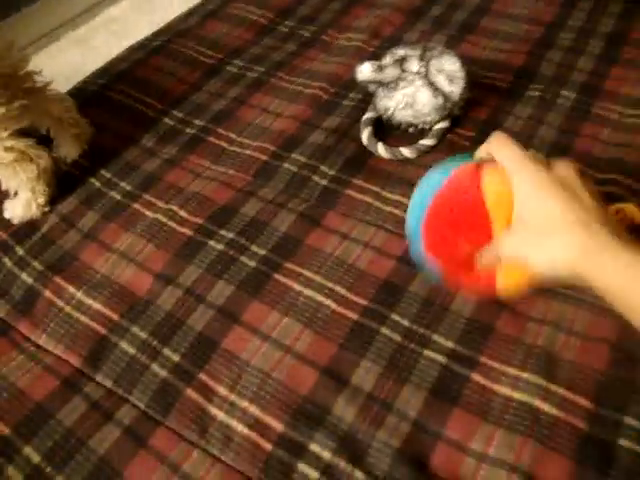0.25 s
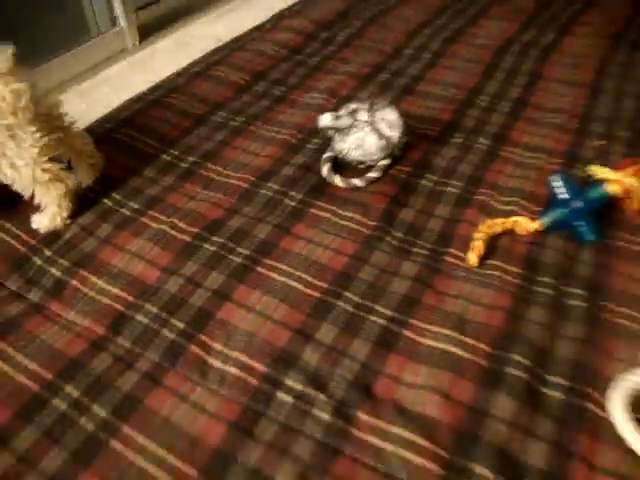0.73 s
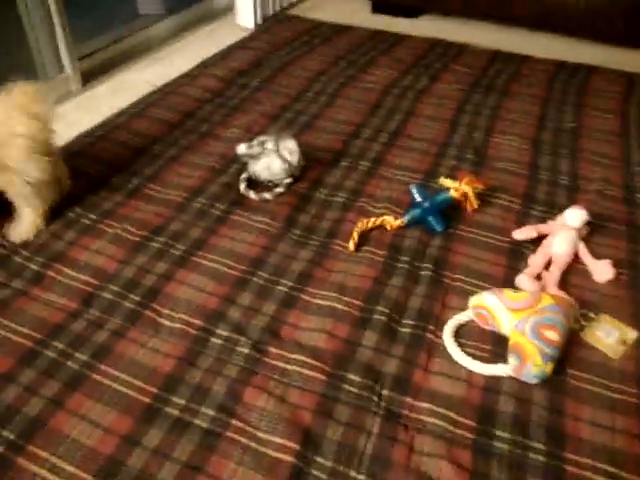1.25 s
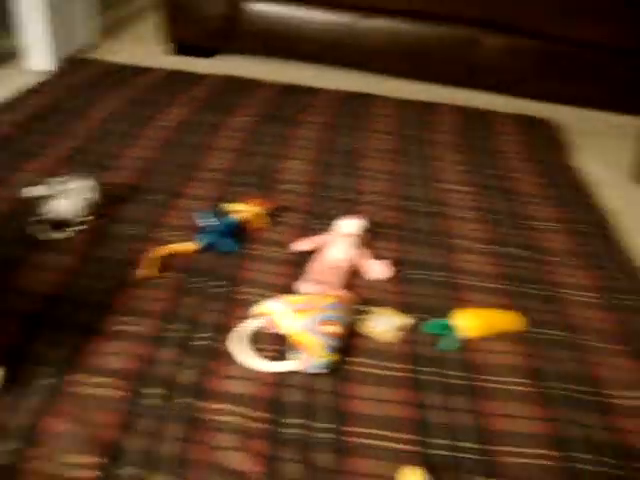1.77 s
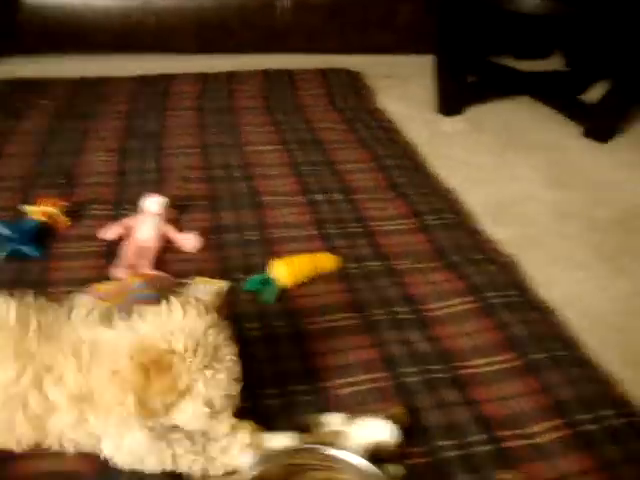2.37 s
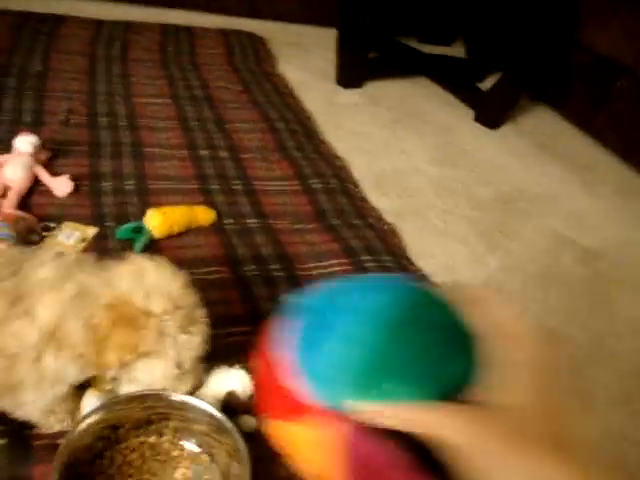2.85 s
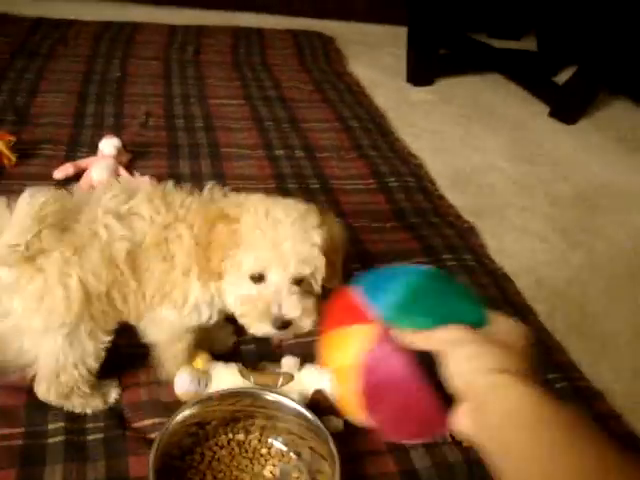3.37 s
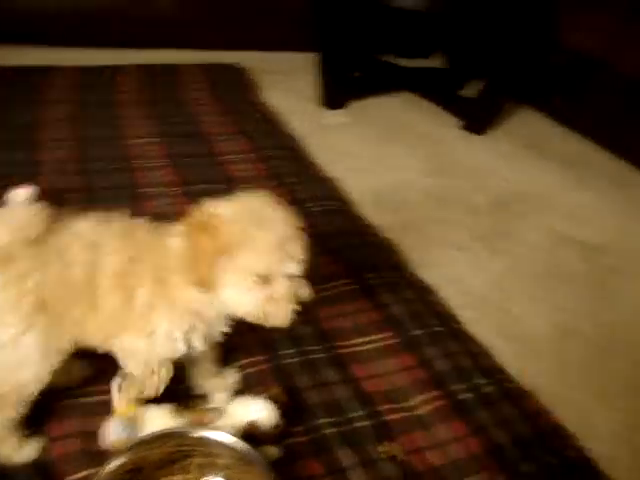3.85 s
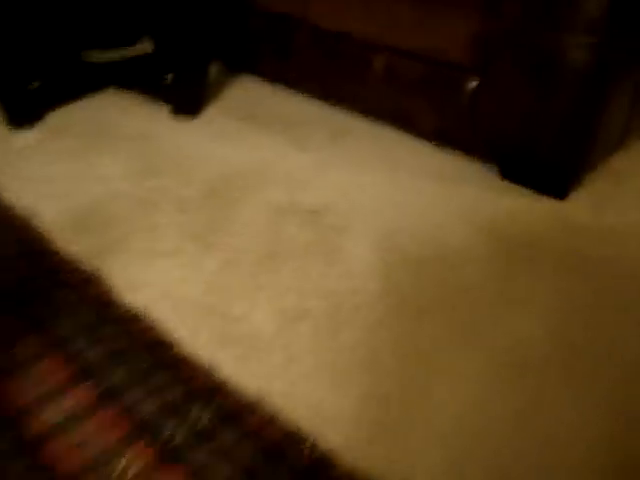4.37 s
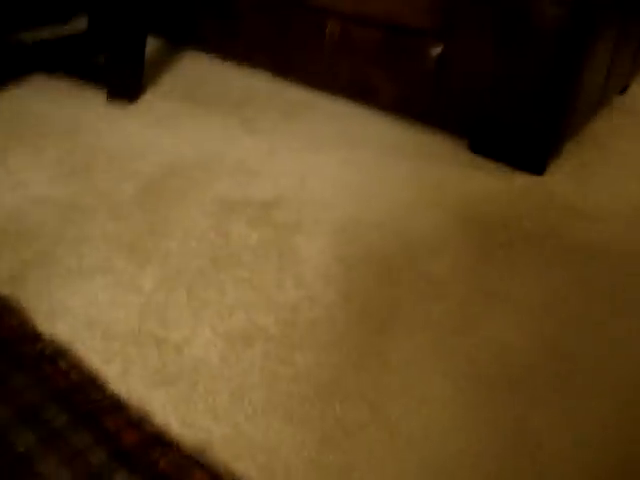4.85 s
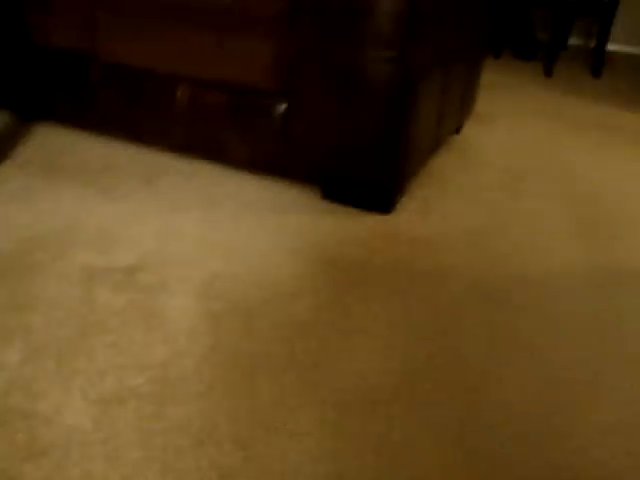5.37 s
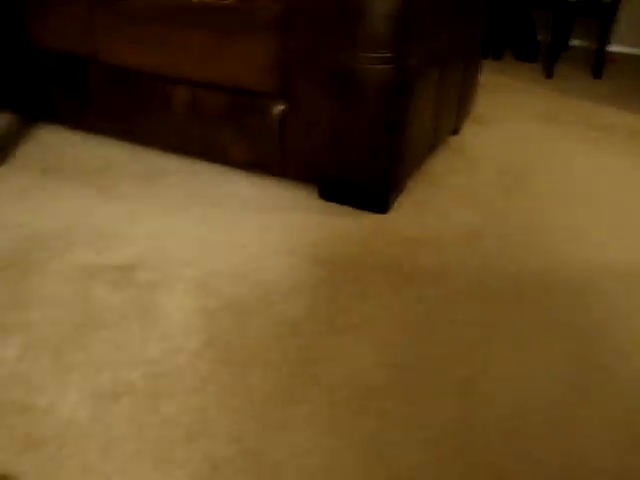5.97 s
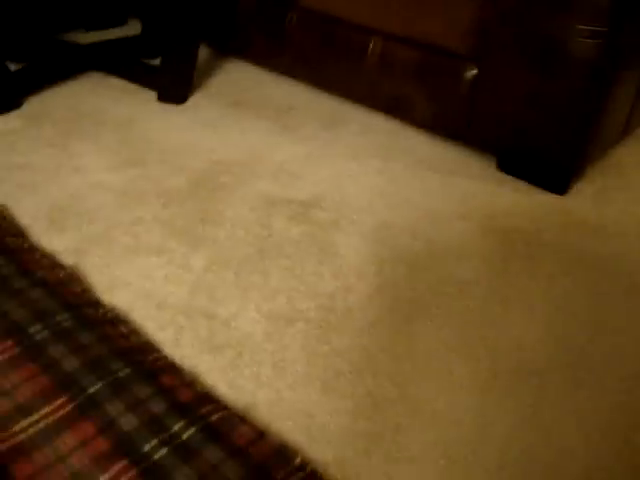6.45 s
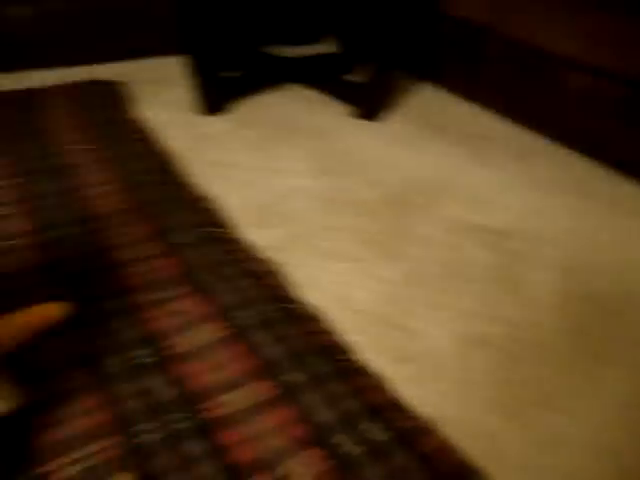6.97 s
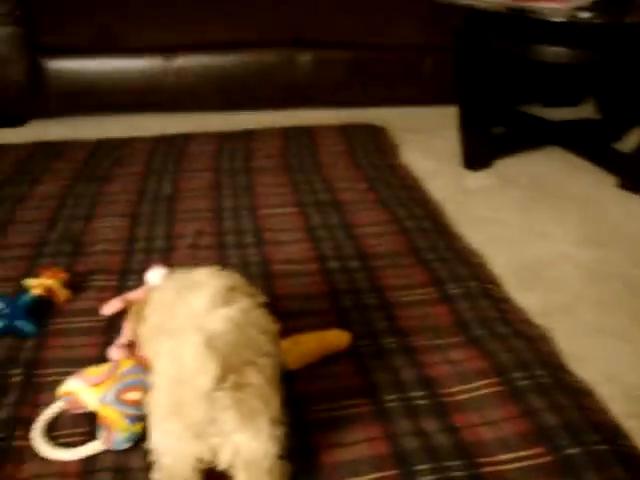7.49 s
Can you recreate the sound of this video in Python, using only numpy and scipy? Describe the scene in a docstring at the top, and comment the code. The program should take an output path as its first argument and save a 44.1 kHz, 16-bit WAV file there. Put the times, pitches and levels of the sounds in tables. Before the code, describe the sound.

Soft household hush with faint low drones and three small handling knocks, then a plush squeaky ball is pumped close to a phone. Bright, buzzy squeaks alternate between falling squeezes and steadier, breathier releases, tightening into rapid chatter. After a short gap come three slower pairs, a longer pause, then one last squeeze and release. Small rubber ticks and dull thumps join in; the carpeted room adds only a short echo.

```python
"""Soft room noise is heard first, then three short knocks, then quick runs of squeaks from a plush ball pumped by hand.
A reed inside sounds as air goes out (squeeze) and comes back in (release); pitch and level follow pressure together.
The rubber bulb buckles now and then, which jolts the pitch and thumps; ticks and dull low thumps join in.
Short echoes of a carpeted living room follow, and a nearby phone rides the gain, clips peaks and cuts the top."""
import sys
import numpy as np
from scipy import signal
from scipy.fft import rfft, irfft
from scipy.io import wavfile
from scipy.ndimage import uniform_filter1d, minimum_filter1d

SR = 44100
rng = np.random.default_rng(int(sys.argv[2]) if len(sys.argv) > 2 else 0)


def pcm_store(signal):
    """Save signal as 16-bit PCM."""
    levels = np.round(np.clip(np.atleast_2d(signal), -1, 1) * 32767)
    wavfile.write(sys.argv[1], SR, levels.astype(np.int16).T)


N = 340672
TIME = np.arange(N) / SR  # seconds
# All levels in dB below are set before the phone changes the gain.


def undb(db):
    """Turn decibels into a gain."""
    return 10 ** (np.asarray(db) / 20)


def unit(x):
    """Scale a sound to an rms (average strength) of 1."""
    return x / np.sqrt(np.mean(x ** 2))


def add(track, s, sound):
    """Mix a sound into the track, starting at s seconds."""
    i = int(s * SR)
    track[i:i + len(sound)] += sound[:N - i]


def band(x, lo_hz, hi_hz, order=2):
    """Keep only the frequencies between two edges (Butterworth band-pass)."""
    edges = [lo_hz, min(hi_hz, SR / 2 - 1)]
    return signal.sosfilt(signal.butter(order, edges, "band", fs=SR, output="sos"), x)


def colour(x, points, size=1024):
    """Shape the tone through (Hz, dB) points with a filter that never sounds ahead of its input."""
    hz, db = np.transpose(points)
    grid = np.maximum(np.arange(size // 2 + 1) * SR / size, 1)
    curve_db = np.interp(np.log(grid), np.log(hz), db)
    # folding the cepstrum forward gives the minimum-phase filter
    cepstrum = irfft(np.log(undb(curve_db)))
    cepstrum[1:size // 2] *= 2
    cepstrum[size // 2 + 1:] = 0
    kernel = irfft(np.exp(rfft(cepstrum)))
    return signal.fftconvolve(x, kernel)[:len(x)]


def wobble(n, rate):
    """Random drift with a spread near 1: straight lines between `rate` random points a second."""
    steps = np.arange(n) * rate / SR
    return np.interp(steps, np.arange(n), rng.standard_normal(n))


# Air pushed out through the reed. Each row: start in seconds, length in seconds, top pitch in Hz,
# sag in Hz per second, last push in Hz, level in dB, then shading of fundamental, octave and buzz in dB.
SQUEEZE_STROKES = [(1.539, 0.054, 1134, 6003, -21, -17, -0.5, -0.5, -7),
                   (1.909, 0.07, 1382, 5509, 8, -19, 4.5, 0.5, 0.5),
                   (2.256, 0.083, 1232, 2985, -5.5, -22.5, 4, 3.5, 2),
                   (2.619, 0.075, 1226, 3205, -9, -18.5, 2.5, 0, 3.5),
                   (3.039, 0.078, 1251, 4603, 0.5, -17, -10, -8, 1.5),
                   (3.396, 0.08, 1189, 4493, 2, -16, -8, -10.5, 0.5),
                   (3.465, 0.017, 1008, -2, 7, -19, -9.5, -6, -2),
                   (3.694, 0.19, 1156, 4489, -18, -15, -9, -9, -2),
                   (3.786, 0.0092, 993, -7, 10, -19, -5, -2, -1.5),
                   (3.971, 0.033, 982, 4000, -36, -17, -6.5, -5, 4),
                   (4.011, .012, 1003, 8, -11, -15.5, -3, -3.5, 0),
                   (4.23, 0.057, 1108, 3808, -22, -20, 4, 0.5, 6),
                   (4.297, 0.011, 1019, 0, -3, -18.5, 1.5, -0.5, 4.5),
                   (4.92, 0.11, 1114, 3705, 230.5, -22, -2, 0, -1),
                   (5.321, 0.077, 1144, 2803, 123.5, -20.5, 1, -1.5, 2),
                   (5.717, .076, 1123, 1196, 82.5, -22, 2, -1, 3),
                   (7.072, .094, 1088, -1, 139.5, -21, -2.5, 0.5, -2)]
# Tone of the reed as air goes out. Each row: frequency in Hz, level in dB.
OUTWARD_TONE = [(500, 0), (1100, -1), (2250, 2), (3400, -4.5), (4500, -5), (5700, -8), (6900, -6.5),
                (8000, -10.5), (9500, -21.5)]


def squeezes():
    """Fingers push air out; these pulses point the opposite way to those of the releases."""
    outward = np.zeros(N)
    for s, length, top_hz, sag, push_hz, *voicing in SQUEEZE_STROKES:
        hz = squeeze_pitch(length, top_hz, sag, push_hz)
        sound = squeak(s, hz, voicing, OUTWARD_TONE, stall_hz=881, span_hz=313, jitter=0.015,
                       shimmer=0.094, hiss_db=-12, attack_s=0.0032, stop_s=0.0014)
        add(outward, s, -sound)
    return outward


# Air drawn back in. Each row: start in seconds, length in seconds, held pitch in Hz, last push in Hz,
# level in dB, then shading of fundamental, octave and buzz in dB.
RELEASE_STROKES = [(1.763, .066, 1065, 109, -12.5, -4.5, -3.5, -7), (2.103, .086, 1032, 22, -22.5, 0, 8, 1),
                   (2.451, 0.08, 1022, 39, -15, -4, 3.5, -5.5), (2.816, 0.078, 1010, 68, -15, -4.5, 3, -2),
                   (3.242, .063, 1015, 49.5, -11.5, -11, -2.5, -1),
                   (3.574, 0.065, 1009, 31, -15, -10.5, -1, -0.5),
                   (3.874, 0.044, 1005, -16, -17, -11, -1.5, 2.5),
                   (4.13, 0.058, 1010, 30, -18, -4, 0.5, -1), (4.411, .056, 989, 77, -14.5, -15, -2, 1),
                   (5.157, 0.056, 1022, 48, -18, -3.5, 6, -0.5), (5.54, .046, 1031, 45, -21, 1.5, 7.5, 2.5),
                   (5.932, 0.05, 1031, 43, -20, -2, 3.5, 2.5), (7.349, 0.082, 1030, 62, -18.5, -9, 4.5, -3)]
# Tone of the reed as air comes in. Each row: frequency in Hz, level in dB.
INWARD_TONE = [(500, 1.5), (1040, 4), (2080, -5), (3100, -9), (4150, -13), (5200, -15), (6200, -27),
               (7250, -11.5), (8300, -12.5), (9500, -19.5)]


def releases():
    """The springing rubber draws air back in through the reed."""
    inward = np.zeros(N)
    for s, length, held_hz, push_hz, *voicing in RELEASE_STROKES:
        hz = release_pitch(length, held_hz, push_hz)
        sound = squeak(s, hz, voicing, INWARD_TONE, stall_hz=876.8, span_hz=264.3, jitter=0.027,
                       shimmer=0.088, hiss_db=-5.5, attack_s=0.0022, stop_s=0.0055)
        add(inward, s, sound)
    return inward


# The bulb buckles or pops back. Each row: time in seconds, pitch leap in Hz, peak of its thump in dB.
BULB_JOLTS = [(1.772, 102, -25), (1.959, 210, -36), (2.322, 194, -25.5), (2.679, 270, -17.5),
              (3.096, 181, -44), (3.4672, 277, -32), (3.7856, 297, -26.5), (4.0123, 313, -24),
              (4.2962, 323, -21.5), (5.16, 91, -29), (5.541, 45.6, -29.5), (5.759, 109, -53),
              (5.935, 61.5, -25), (7.356, 64.4, -29.5)]
# overtone flicker: spread in dB at the tenth partial under full pressure, and changes per second
FLICKER_DB, FLICKER_PER_S = 7, 300


def squeak(start, hz, voicing, reed_tone, stall_hz, span_hz, jitter, shimmer, hiss_db, attack_s, stop_s):
    """One stroke of the bulb through the reed, which slaps shut once a cycle and makes a row of overtones."""
    level_db, fundamental_db, octave_db, buzz_db = voicing
    n = len(hz)
    t = np.arange(n) / SR
    hz = hz + sum(leap * jolt_shape(start + t - s) for s, leap, _ in BULB_JOLTS)
    # the reed stalls at low pressure, and its swing saturates at high pressure
    pressure = np.maximum(hz - stall_hz, 0) / span_hz
    fade_in = np.clip(t / attack_s, 0, 1)
    fade_out = np.clip((t[-1] - t) / stop_s, 0, 1)
    swing = np.tanh(pressure) * fade_in * fade_out
    # harder blowing makes the cycles uneven
    uneven_hz = hz * (1 + jitter * pressure * wobble(n, 1093.6))
    phase = 2 * np.pi * np.cumsum(uneven_hz) / SR
    # a small swing no longer shuts the reed, so the overtones fade first
    closure = np.clip(swing / 0.49, 0, 1) ** 0.41
    pulses = np.zeros(n)
    for k in range(1, 11):
        flicker_db = FLICKER_DB * k / 10 * np.minimum(pressure, 1) * wobble(n, FLICKER_PER_S)
        pulses += closure ** (k - 1) * undb(flicker_db) * np.cos(k * phase)
    pulses *= 1 + shimmer * pressure * wobble(n, 700)
    # air rushes through the gap while the reed is open
    rush = unit(band(rng.standard_normal(n), 1990, 14000))
    hiss = undb(hiss_db) * pressure * (1 - np.cos(phase) / 2) * rush
    # the grip and the plush cover shade the low partials and the buzz differently each time
    shade_hz = [1200, 2050, 2400, 3000, 3820, 5640]
    shade_db = [fundamental_db, octave_db, octave_db, 0, 0, buzz_db]
    shaded = [(f, db + np.interp(f, shade_hz, shade_db)) for f, db in reed_tone]
    with_tail = np.pad((pulses + hiss) * swing, (0, 256))  # room for the filter to ring out
    return np.sqrt(2) * undb(level_db) * colour(with_tail, shaded)


def jolt_shape(t, rise_s=0.00302):
    """A pressure jolt: up to 1 in a few milliseconds, then away."""
    u = np.maximum(t, 0) / rise_s
    return (u * np.exp(1 - u)) ** 2


# a squeeze with a higher top climbs to it from this pitch while the fingers close
SQUEEZE_START_HZ, SQUEEZE_RISE_S = 1092, 0.016


def squeeze_pitch(length, top_hz, sag_hz_per_s, push_hz):
    """The fingers build up pressure, which then sags steadily as the bulb empties."""
    t = np.arange(int(length * SR)) / SR
    climb_left = np.cos(np.pi / 2 * np.minimum(t / SQUEEZE_RISE_S, 1)) ** 2
    to_climb = max(top_hz - SQUEEZE_START_HZ, 0) * climb_left
    hz = top_hz - to_climb - sag_hz_per_s * np.maximum(t - SQUEEZE_RISE_S, 0)
    return stroke_end(uniform_filter1d(hz, size=400, mode="nearest"), push_hz)


# a release overshoots a little as the rubber springs back, then settles
OVERSHOOT_HZ, SETTLE_S = 27.6, 0.0074


def release_pitch(length, held_hz, push_hz):
    """The rubber's own spring refills the bulb with an almost even pull."""
    t = np.arange(int(length * SR)) / SR
    return stroke_end(held_hz + OVERSHOOT_HZ * np.exp(-t / SETTLE_S), push_hz)


# place and width of the last push, as shares of the stroke
PUSH_AT, PUSH_WIDTH = 0.77, 0.1543
# the air runs out over this last share of the stroke, and the pitch falls to this end
RUN_OUT_SHARE, RUN_OUT_HZ = 0.21, 868


def stroke_end(hz, push_hz):
    """A last push bends the pitch up (or down if negative); then the air runs out and the pitch drops."""
    along = np.linspace(0, 1, len(hz))
    hz = hz + push_hz * np.exp(-((along - PUSH_AT) / PUSH_WIDTH) ** 2)
    run_out = np.clip(1 - (1 - along) / RUN_OUT_SHARE, 0, 1) ** 2
    return hz + (RUN_OUT_HZ - hz) * run_out


# Dull low thumps under some of the squeaks. Each row: time in seconds, peak in dB.
LOW_THUMPS = [(1.776, -50), (1.813, -54), (1.92, -53), (1.96, -56), (2.499, -56), (2.624, -46.5),
              (2.68, -48), (3.048, -57), (3.092, -57), (7.138, -52)]
# Small ticks of the bulb between squeaks and after the last. Each row: time in seconds, peak in dB.
BULB_TICKS = [(1.74, -35), (2.779, -34), (3.200, -32.5), (5.115, -36), (5.493, -36), (5.88, -33),
              (7.448, -28)]
# Short knocks of handling. Each row: time in seconds, peak in dB, lower edge in Hz, upper edge in Hz.
HANDLING_KNOCKS = [(.623, -36.5, 330, 2280), (0.704, -42, 283, 560), (.803, -34.5, 210, 1140)]


def thumps_ticks_and_knocks():
    """Short noise bursts: thumps and ticks of the rubber bulb, dull low thumps and knocks of handling."""
    out = np.zeros(N)
    for s, _, db in BULB_JOLTS:
        add(out, s + 0.001, burst(db, lo_hz=314, hi_hz=1400, t60=0.021))
    for s, db in LOW_THUMPS:
        add(out, s, burst(db, lo_hz=35, hi_hz=177, t60=0.023))
    for s, db in BULB_TICKS:
        add(out, s, burst(db, lo_hz=900, hi_hz=3600, t60=0.009))
    for s, db, lo_hz, hi_hz in HANDLING_KNOCKS:
        add(out, s, burst(db, lo_hz, hi_hz, t60=0.014))
    return out


def burst(db, lo_hz, hi_hz, t60):
    """A damped burst: noise that dies by 60 dB in t60 seconds, filtered and set to a peak level."""
    t = np.arange(SR // 8) / SR
    dying = rng.standard_normal(len(t)) * np.exp(-np.log(1000) * t / t60)
    sound = band(dying, lo_hz, hi_hz, order=3)
    return undb(db) * sound / np.abs(sound).max()


def furniture(x):
    """Early echoes off nearby hard faces; they overlap the gliding upper overtones and roughen them."""
    return signal.fftconvolve(x, decay(2700, 14000, t60=0.07, build_s=0.0013))[:N]


def room(x, share, low_db=-10, mid_db=-11, high_db=-5):
    """The diffuse tail of a carpeted room; treble is beamed at a near phone, so its share shrinks faster."""
    low = undb(low_db) * decay(180, 1400, t60=0.34, build_s=0.0052)
    mid = undb(mid_db) * decay(1300, 5200, t60=0.25, build_s=0.0068)
    treble = undb(high_db) * decay(3700, 9000, t60=0.22, build_s=0.051)
    body_tail = signal.fftconvolve(x * share, low + mid)
    treble_tail = signal.fftconvolve(x * share ** 1.46, treble)
    return (body_tail + treble_tail)[:N]


def decay(lo_hz, hi_hz, t60, build_s):
    """Dense echoes of one click in one band: they build up, then die away; total energy 1."""
    t = np.arange(SR * 2 // 3) / SR
    build_up = 1 - np.exp(-(t / build_s) ** 2)
    die_away = np.exp(-np.log(1000) * t / t60)
    echoes = band(rng.standard_normal(len(t)), lo_hz, hi_hz) * die_away * build_up
    return echoes / np.sqrt(np.sum(echoes ** 2))


# Tone of the room's rush. Each row: frequency in Hz, relative level in dB.
RUSH_TONE = [(18, -91), (30, -44.5), (52, -25), (91, -23.5), (176, -17.5), (382, -13.5), (475, -10),
             (590, -8.5), (650, -7.5), (1220, -11.5), (1380, -12.5), (1930, -15), (3720, -18), (5350, -20),
             (9800, -25.5), (12700, -58), (21600, -120)]
# Loudness of the rush. Each row: time in seconds, level in dB.
RUSH_LEVEL = [(0, -58.5), (1.5, -57.5), (2.6, -56), (2.999, -68), (4.0, -57), (4.7, -59.5), (5.5, -59.5),
              (7.0, -60.5), (7.7, -57)]
# Low drones in the room. Each row: centre in Hz, width in Hz, relative level in dB.
ROOM_DRONES = [(168.5, 30, -6.5), (265, 196, 2), (491, 69, 0.5)]
# The drones are strong at first, sink low around 3 s, then partly return.
# Each row: time in seconds, level in dB.
DRONES_LEVEL = [(0, -65.5), (1.4, -65.5), (2.6, -71.5), (3.1, -89), (4.8, -75.5), (7.7, -68.5)]
# each drone wavers on its own: spread in dB, changes per second
DRONE_WAVER_DB, DRONE_WAVER_PER_S = 3.5, 3.5


def room_noise(waver_db=0.8):
    """Household rush, noise with a drifting level and a slight waver, over drones of narrow noise bands."""
    rush = unit(colour(rng.standard_normal(N), RUSH_TONE, size=4096))
    rush_db = np.interp(TIME, *np.transpose(RUSH_LEVEL)) + waver_db * wobble(N, 15)
    drones = np.zeros(N)
    for hz, width, db in ROOM_DRONES:
        drone = unit(band(rng.standard_normal(N), hz - width / 2, hz + width / 2))
        drones += drone * undb(db + DRONE_WAVER_DB * wobble(N, DRONE_WAVER_PER_S))
    drones_db = np.interp(TIME, *np.transpose(DRONES_LEVEL))
    return rush * undb(rush_db) + drones * undb(drones_db)


# How much of the sound the room adds, low while the ball is near the phone.
# Each row: time in seconds, share in dB.
ROOM_PART = [(1.5, -14.5), (2.3, -10.5), (2.6, -16.5), (3.05, -18.5), (3.5, -21.5), (4.0, -16.5),
             (4.95, -15.5), (5.75, -11.5), (7.4, -11.5)]


def scene(out_early_db=1, in_early_db=-3, in_room_db=0):
    """The toy close by, the room around it."""
    outward, inward = squeezes(), releases()
    bursts = thumps_ticks_and_knocks()
    share = undb(np.interp(TIME, *np.transpose(ROOM_PART)))
    early = furniture(share * (undb(out_early_db) * outward + undb(in_early_db) * inward))
    late = room(outward + undb(in_room_db) * inward + bursts, share)
    return (outward + inward + bursts + early + late + room_noise())[None]


def gain_control(x, lift_db=4, knee_db=-24, window_s=0.024, slew_s=0.012):
    """Quiet passages are lifted; the gain drops just ahead of a loud sound and comes back soon after it."""
    peak = -minimum_filter1d(-np.abs(x).max(axis=0), int(window_s * SR))
    cut_db = np.clip(20 * np.log10(peak + 1e-9) - knee_db, 0, lift_db)
    return x * undb(lift_db - uniform_filter1d(cut_db, int(slew_s * SR)))


def record(dry):
    """The phone rides the gain, clips the highest peaks and cuts the top steeply."""
    clipped = np.clip(gain_control(dry), -0.85, 0.85)
    top_cut = signal.ellip(10, 0.2, 70, 9750, fs=SR, output="sos")  # low-pass edge at 9750 Hz
    return signal.sosfilt(top_cut, clipped)


dry = scene()
out = record(dry)
pcm_store(out)
```